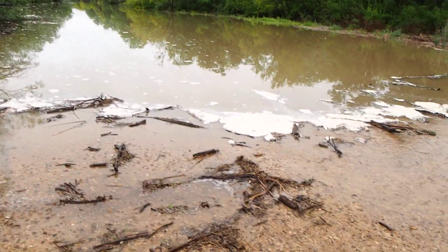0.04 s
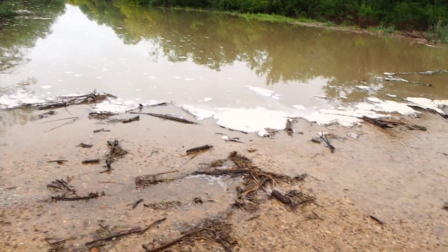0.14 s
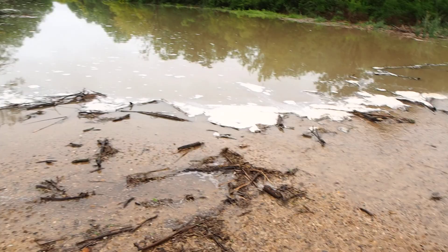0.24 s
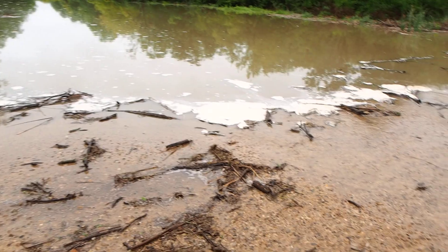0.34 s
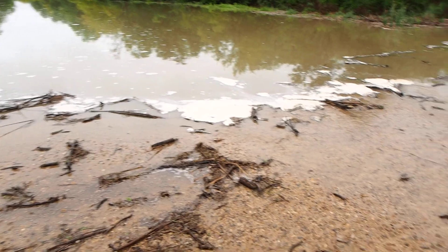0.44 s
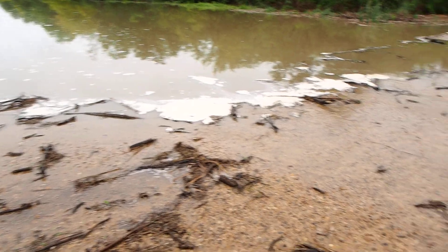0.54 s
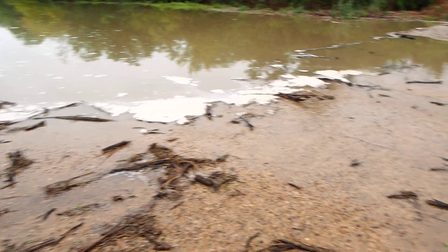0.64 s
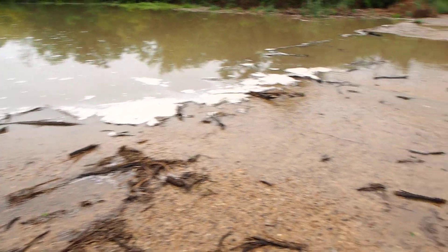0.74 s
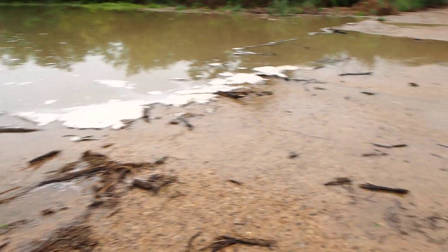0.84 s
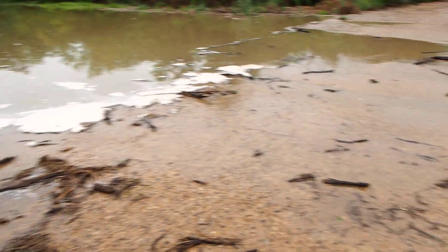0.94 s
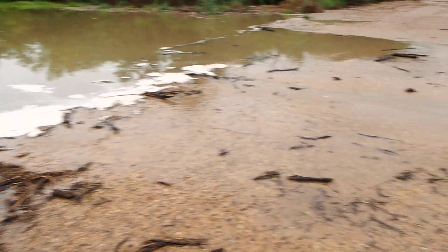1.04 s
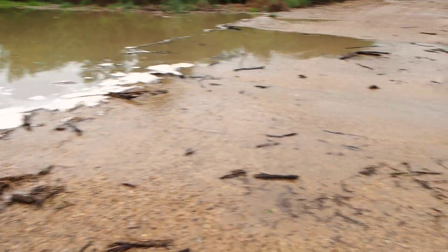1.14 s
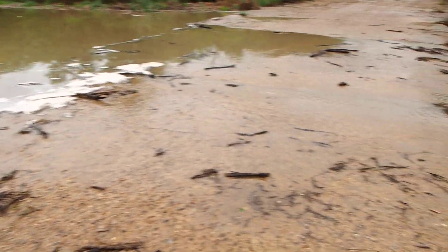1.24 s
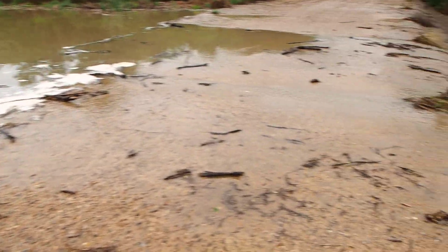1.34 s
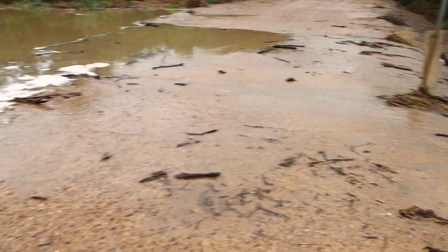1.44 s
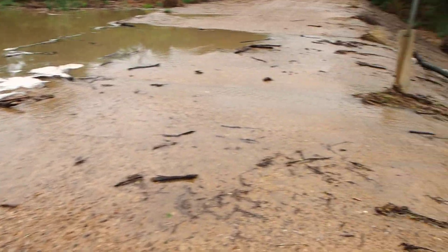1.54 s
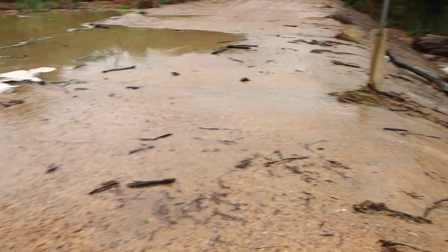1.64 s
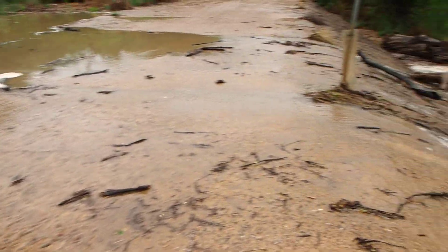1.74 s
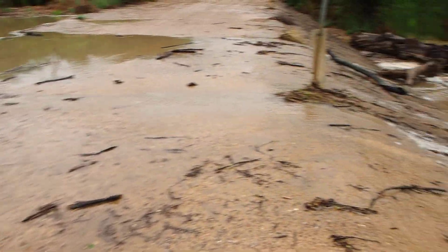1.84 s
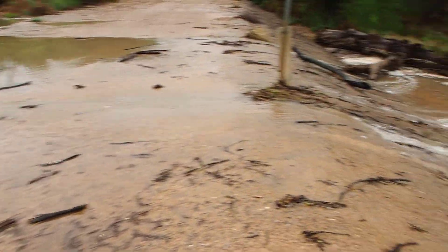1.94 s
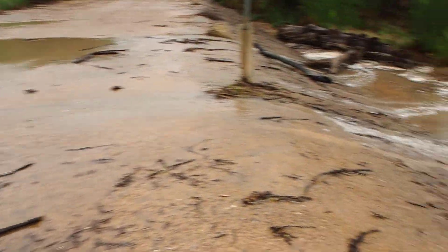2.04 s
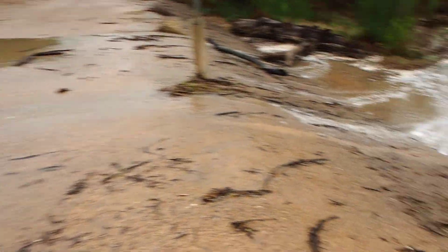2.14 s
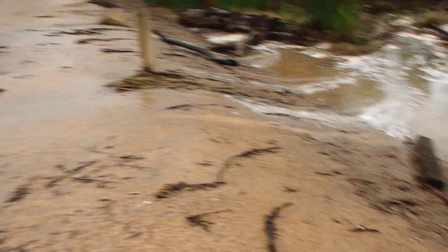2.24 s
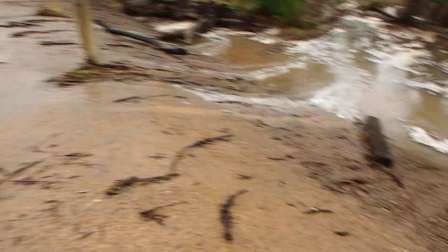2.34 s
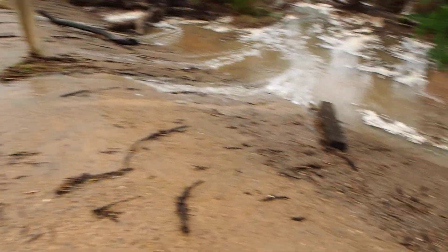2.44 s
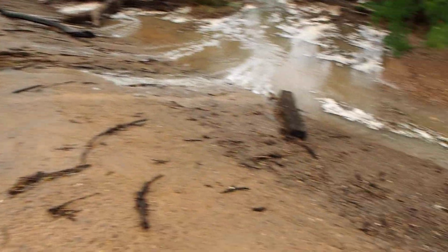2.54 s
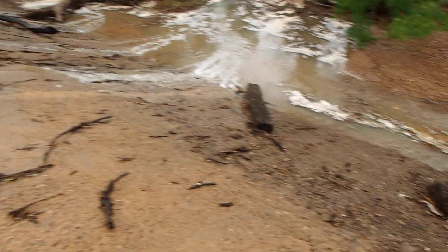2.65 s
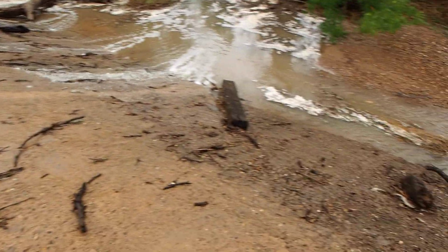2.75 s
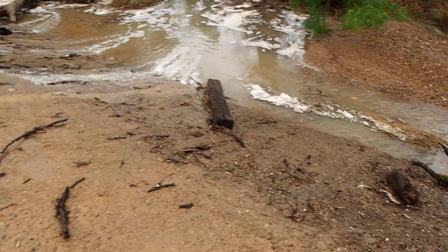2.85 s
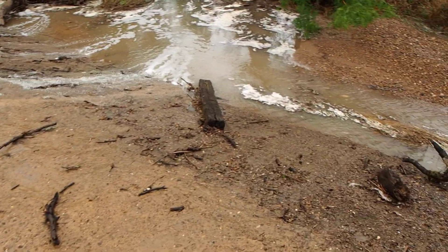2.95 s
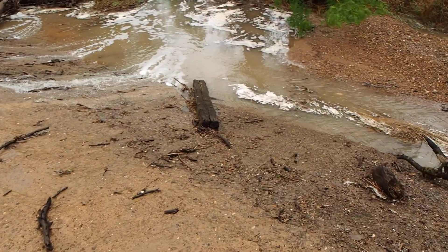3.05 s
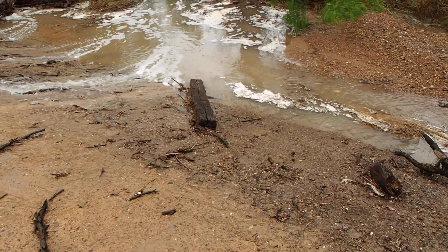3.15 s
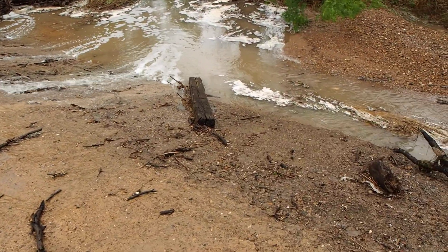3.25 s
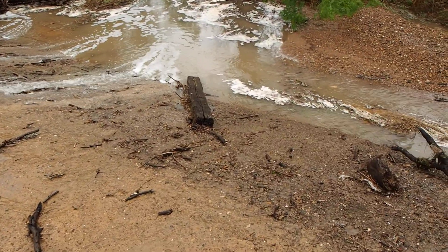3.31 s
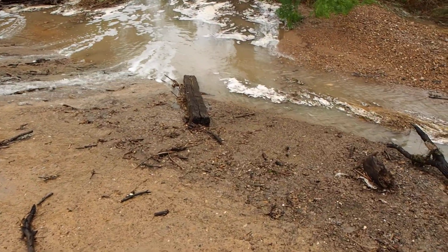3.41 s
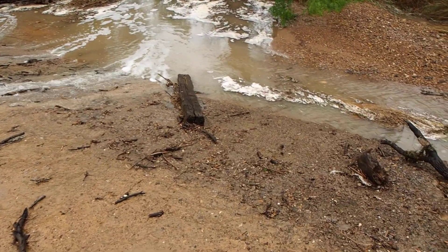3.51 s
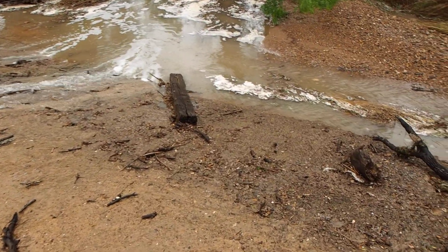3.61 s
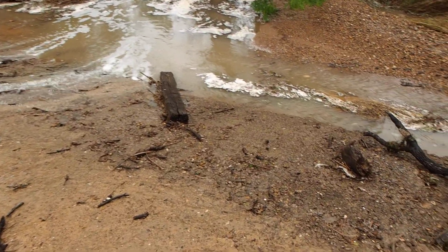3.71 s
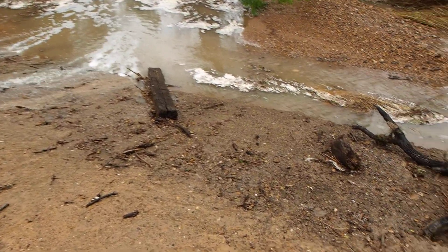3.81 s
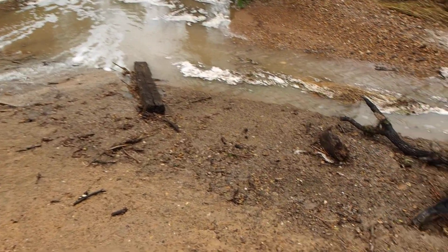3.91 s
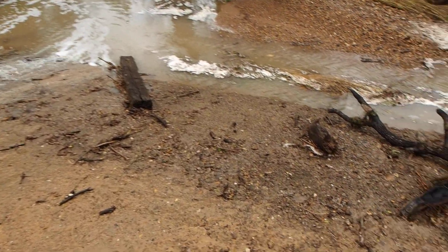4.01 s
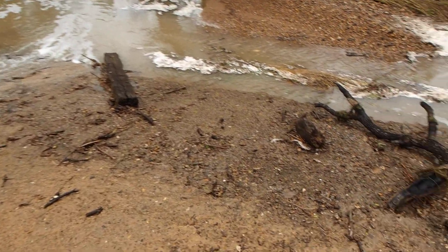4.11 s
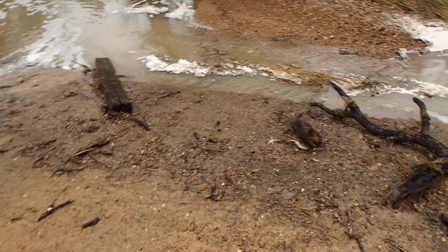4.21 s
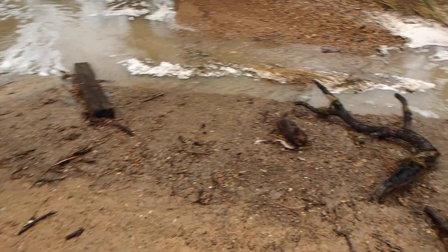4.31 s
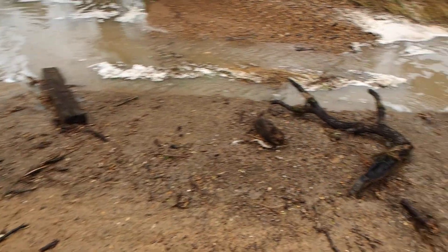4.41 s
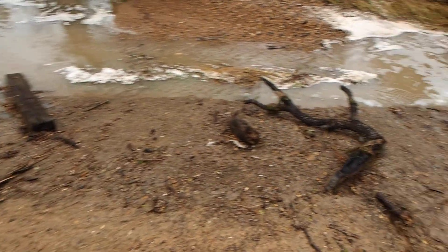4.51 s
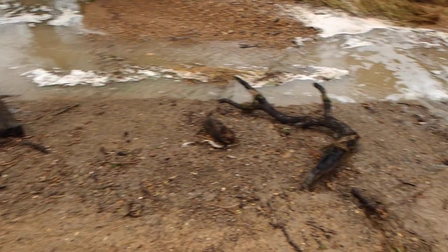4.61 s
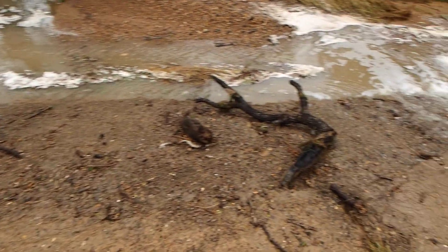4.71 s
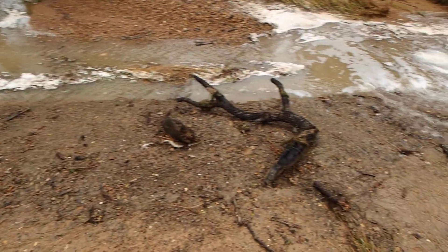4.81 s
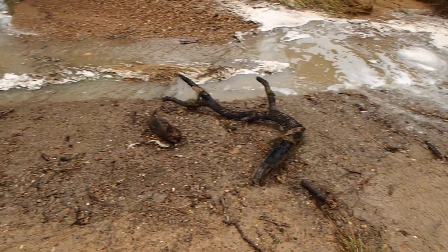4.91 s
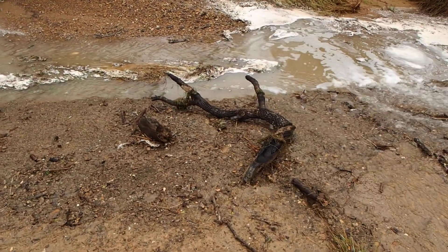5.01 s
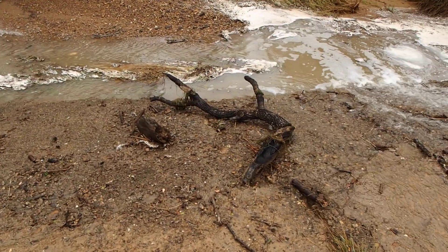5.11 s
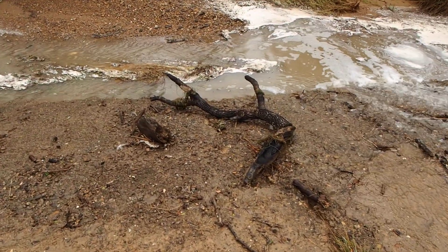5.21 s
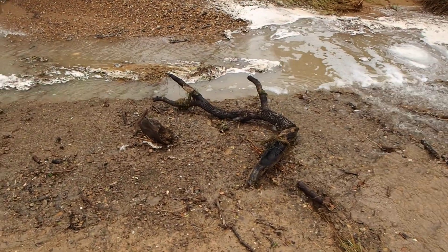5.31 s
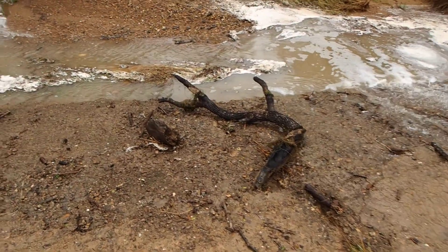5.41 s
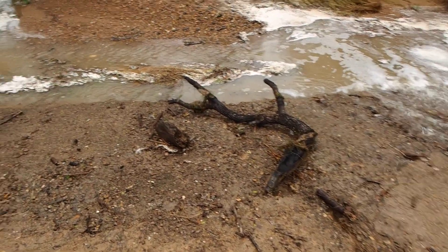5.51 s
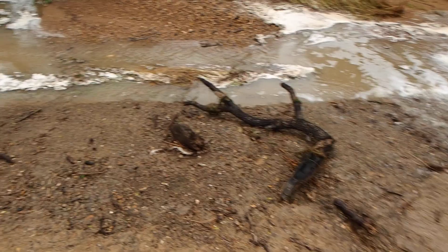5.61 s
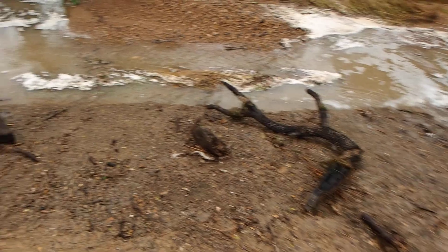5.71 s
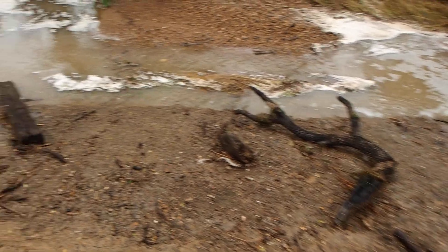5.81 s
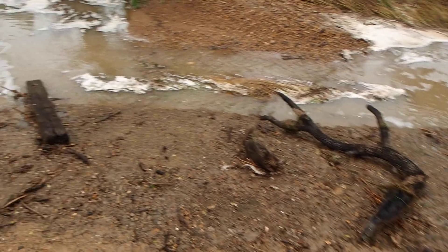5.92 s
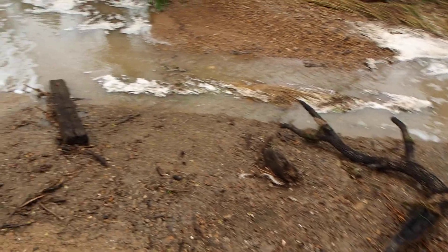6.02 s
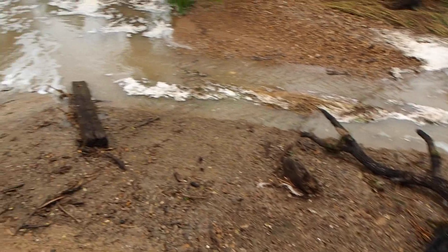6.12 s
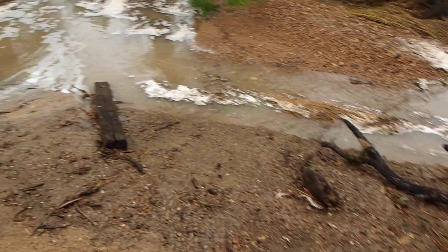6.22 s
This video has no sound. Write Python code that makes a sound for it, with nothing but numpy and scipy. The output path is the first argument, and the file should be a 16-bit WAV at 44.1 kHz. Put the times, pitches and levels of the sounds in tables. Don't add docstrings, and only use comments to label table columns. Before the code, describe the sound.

Broad turbulent creek rush with bubbling and fine spray ticks, starting duller, then growing fuller and hissier; low wind buffets come and go.

```python
import sys
import numpy as np
from scipy import signal
from scipy.fft import rfft, irfft, next_fast_len
from scipy.io import wavfile
from scipy.ndimage import map_coordinates

SR = 44100
rng = np.random.default_rng(int(sys.argv[2]) if len(sys.argv) > 2 else 0)


def elevation(decibels):
    levels = np.asarray(decibels, float)
    return 10 ** (levels / 20)


def to_wav(sig):
    pcm = np.clip(np.atleast_2d(sig), -1, 1) * 32767
    pcm = np.round(pcm).astype(np.int16)
    wavfile.write(sys.argv[1], SR, pcm.T)


N = 276066
CONTROL = 32

# f/Hz, level/dB [per Hz], left-right likeness [0-1], left minus right/dB
SIDE_SPECTRUM = [(35, -9, .5, 4), (86, -1.5, 0.66, -1), (244, -17, 0.9, 1.5), (447, -8.5, 0.9, 2.5),
                 (545, -11, 0.83, 4.5), (970, 1.5, 0.86, -1), (1250, -2.5, 0.42, 0), (2020, 1, 0.74, -6),
                 (3670, -9, 1, -6.5), (4850, -13, 0.94, -3.5), (6650, -20, 0.98, -8), (8600, -18.5, 0.4, 1),
                 (10800, -24, 0.9, -8), (15500, -40.5, .12, 0)]
FRONT_SPECTRUM = [(35, -11, 1, 0), (85, -1, 0.97, 0.5), (246, -18, 0.84, 1), (452, -9.5, 0.95, 1.1),
                  (497, -12.5, 1, 1.5), (929, 3.5, 0.91, 0.5), (1310, -1, 0.33, -1), (1940, 2.5, 0.12, -4),
                  (3760, -2.5, 0.27, 0), (5080, -9, 0.86, -0.5), (6980, -15, 0.16, -2),
                  (8600, -11, 0.3, 2.3), (10980, -19, 0.7, -4), (15500, -30.5, 0.12, 8.5)]
# t/s, lag of the left port for the crossing/samples
TURN_LAG = [(0, 5.6), (.4, 5.5), (.65, 4.7), (.9, 4.4), (1.5, 4.2), (1.8, 3.4), (2.05, 2.2), (2.7, -2.6),
            (3.3, -3.2), (4.1, -4.0), (5.1, -5.4), (6.26, -4.0)]
# t/s, rush level/dB, churn of white water level/dB
FLOW_LEVELS = [(0, -28.5, -3.5), (.7, -28.5, -7.5), (1.05, -29, 0), (1.75, -27.5, 4), (2.1, -26, 4),
               (2.5, -26.5, 2.5), (3.45, -25.5, -5.5), (3.8, -27, 3.5), (4.2, -26.5, 3), (4.85, -25, -1.4),
               (5.55, -25.5, -.5), (5.9, -27, 5), (6.26, -26.5, 2)]
# lag/samples, extra brightness/(dB per octave), extra left minus right/dB,
# extra deep roar level/dB
HOUSING_SHADE = [(0.5, 0.56, -0.26, 1), (-4, .8, -.2, .6), (-9, .5, 8, -3), (3, 0.1, -0.9, 0.5),
                 (4, .8, -1.4, 1.1), (4.5, 0.3, -2.5, 0), (5.5, -1.15, 0.1, 1.5)]
# t/s, half length/s, level/dB
BACKWATER_GURGLES = [
    (2.35, .2, 3.5),
    (4.0, 0.24, 3.5),
    (5.95, .3, 5.5),
]
# f/Hz, width/Hz, level/dB
PORT_RESONANCES = [
    [(1060, 52, 2.5), (9500, 900, 0.5), (12800, 1700, -2.5), (15600, 1300, -2)],
    [(1012, 46, 1.5), (9600, 1070, 2.5), (11500, 930, -0.9), (15600, 1300, 4)],
]
# t/s, peak level/dB [nearer port], f/Hz, left minus right/dB
NEAR_DROPS = [(1.231, -20, 10200, -31), (1.4691, -27, 8400, -10), (2.0396, -26, 11200, -14),
              (2.3054, -26, 9600, -9), (2.615, -22, 9500, -18), (2.6958, -21, 8750, 10),
              (3.5078, -18.5, 9500, -12), (3.686, -28, 8800, -12), (3.7087, -12.5, 8100, -8),
              (4.2433, -19, 8600, -6), (4.3598, -23, 11800, -12), (4.8161, -33, 6200, -19),
              (5.0387, -20, 11800, -12), (5.389, -17, 9000, 7), (5.4698, -24, 8600, -10),
              (5.5652, -18, 5800, -9), (5.6394, -18, 8000, -12), (5.6637, -19, 10200, -12),
              (5.6988, -22, 11100, -12), (5.7571, -21, 8500, 12), (6.0769, -21, 4500, -1),
              (6.174, -21, 9600, -5)]
# t/s, half length/s, level/dB
PORT_GUSTS = [
    [(2.15, 0.22, -46), (3.9, 0.16, -48), (4.45, .1, -48.5)],
    [(.24, 0.15, -37), (.85, 0.2, -46), (1.25, 0.11, -44), (1.62, 0.082, -51)],
]
# t/s, peak level/dB, f/Hz
HARD_EDDIES = [
    [(.068, -46, 84.3), (2.012, -53, 90), (2.041, -45, 86), (2.192, -43, 94), (3.922, -44, 85),
     (4.374, -34, 76), (4.445, -41, 92), (4.505, -42, 86)],
    [(.006, -38, 86), (.274, -40, 108), (.416, -34, 93.5), (.463, -27, 85.4), (.501, -30, 91.5),
     (.532, -23.5, 115), (.585, -28, 152), (.62, -36, 79.5), (.663, -33, 110), (.805, -41, 108),
     (1.051, -40, 96), (1.251, -35.5, 77), (1.366, -33, 89.5), (1.401, -34, 72), (1.428, -30, 126),
     (1.494, -29.5, 116), (1.534, -35, 77), (1.623, -42, 80)],
]

SIDE_ON_LAG, HEAD_ON_LAG = 5, -4.5
CREEK_LAG, CREEK_FOLLOWS, CREEK_MOST = 7.64, 0.85, 7.1
CHURN_BRIGHTENS = 0.1
RIPPLE_DB, LIKENESS_LOST = 2.2, 0.32
TOP_SHADE_DB = 1.5
FAINT_DROPS, FAINT_DB, FAINT_SCATTER_DB, FAINT_HZ, FAINT_PAN_DB = 16, -34, 8, 9500, -11
EDDIES_PER_S, EDDY_HZ, EDDY_SPREAD_OCT, EDDY_SCATTER_DB = 27, 92, 0.26, 4


def rush():
    turn, = in_time(TURN_LAG, step=CONTROL)
    rush_db, churn_db = in_time(FLOW_LEVELS, step=CONTROL)
    facing = np.clip((SIDE_ON_LAG - turn) / (SIDE_ON_LAG - HEAD_ON_LAG), 0, 1)
    creek_lag = np.minimum(CREEK_LAG + CREEK_FOLLOWS * turn, CREEK_MOST)
    lag, *shading = np.transpose(HOUSING_SHADE)
    bright_db, lean_db, roar_db = (np.interp(turn, lag, column) for column in shading)
    bright_db = bright_db + CHURN_BRIGHTENS * churn_db
    gurgle_db = gurgling(np.arange(len(facing)) * CONTROL / SR)
    hiss = rng.standard_normal((2, 4, N))
    grains = splashes(per_s=2400, spread_db=5.0, count=4)
    surge = 0.4 * drift(6.0) + 2.5 * drift(28.0)
    edges = 25 * 2 ** (np.arange(29) / 3)
    aimed = np.zeros((2, 2, 2, N))
    diffuse = np.zeros((2, N))
    for k, (low, high) in enumerate(zip(edges, edges[1:])):
        hz = np.sqrt(low * high)
        grainy = np.clip(0.2 * np.log2(hz / 1500), 0, 0.6)
        shifted = np.roll(grains, 9001 * (k // 2), axis=1)
        source = np.sqrt(1 - grainy ** 2) * hiss[k % 2] + (-1) ** k * grainy * shifted
        third_octave = signal.butter(2, [low, high], "band", fs=SR, output="sos")
        bands = signal.sosfilt(third_octave, source)

        side, front = at_hz(SIDE_SPECTRUM, hz), at_hz(FRONT_SPECTRUM, hz)
        db, alike, pan_db = ((1 - facing) * a + facing * b for a, b in zip(side, front))
        db = db - front[0] - 25.0
        surge_share = 0.1 if 900 < hz < 3500 else 0.3
        db = db + (surge_share * surge + 0.72 * drift(28.0)) * (1.4 if hz < 350 else 0.9)
        if hz > 200:
            if hz < 1300:
                tilt_db = roar_db * (1.3 if hz < 850 else 0.9)
            else:
                tilt_db = bright_db * np.log2(hz / 2000)
            churn = churn_db * np.exp(-(np.log2(hz / (1750 + 750 * facing ** 2)) / 0.26) ** 2)
            db = db + rush_db + 29.5 + tilt_db + 0.91 * churn
            pan_db = pan_db + lean_db + 0.81 * churn
        if hz > 11000:
            db = db - TOP_SHADE_DB * facing * np.maximum(creek_lag - 4.2, 0)
        if 140 < hz < 480:
            db = db + gurgle_db
        if hz > 1500:
            half_waves = 2 * hz * turn / SR
            ripple_db = -RIPPLE_DB * np.cos(np.pi * half_waves) * (1 - facing)
            db, pan_db = db + ripple_db / 2, pan_db + ripple_db
            alike = alike - LIKENESS_LOST * np.clip((half_waves - 1) / 0.12, 0, 1)
        alike = np.clip(alike, 0, 1)

        spill = 0.64 * np.exp(-(np.log2(hz / 5300) / 0.74) ** 2) + 0.32 * (hz < 1600)
        creek = np.clip(facing * (0.82 - spill), 0, 1)
        waves = aimed[int(hz < 1300)]
        for port, sign in enumerate((0.5, -0.5)):
            gain = elevation(db + sign * pan_db)
            waves[0, port] += full(gain * np.sqrt(alike * (1 - creek))) * bands[2]
            waves[1, port] += full(gain * np.sqrt(alike * creek)) * bands[3]
            diffuse[port] += full(gain * np.sqrt(1 - alike)) * bands[port]
    return colour(diffuse + arrive(aimed, (turn, creek_lag)), FRONT_SPECTRUM)


def gurgling(t):
    return sum(db * np.exp(-((t - mid) / half) ** 2) for mid, half, db in BACKWATER_GURGLES)


def arrive(aimed, lags):
    out = np.zeros((2, N))
    for waves, bend in zip(aimed, (0, 1.8)):
        for (left, right), lag in zip(waves, lags):
            when = np.arange(N) - full(lag + bend)
            out[0] += map_coordinates(left, [when], order=3, mode="nearest")
            out[1] += right
    return out


def colour(x, spectrum):
    size = next_fast_len(N)
    hz = np.maximum(np.arange(size // 2 + 1) * SR / size, 1)
    db = at_hz(spectrum, hz)[0] - 18.0 * np.maximum(np.log2(spectrum[0][0] / hz), 0)
    humps = [sum(level * np.exp(-((hz - mid) / width) ** 2) for mid, width, level in port)
             for port in PORT_RESONANCES]
    return irfft(rfft(x, size) * elevation(db + np.array(humps)), size)[:, :N]


def splashes(per_s, spread_db, count):
    sizes = elevation(spread_db * np.minimum(rng.exponential(1, (count, N)), 5.5))
    signs = rng.choice([-1, 1], (count, N))
    return unit(sizes * signs * (rng.random((count, N)) < per_s / SR))


def bubbles(late):
    rush_db = in_time(FLOW_LEVELS)[0]
    pops = splashes(per_s=500, spread_db=3.0, count=1)[0]
    pitches = np.geomspace(600, 2400, num=16)
    dealt = rng.integers(0, 16, N)
    rings = sum(np.sqrt(hz) * ring(pops * (dealt == k), hz, 19.0 / hz) for k, hz in enumerate(pitches))
    rings = elevation(rush_db - 17.5) * unit(rings)
    left = elevation(-4.5) * np.interp(np.arange(N) - late, np.arange(N), rings)
    return np.array([left, rings])


def ring(clicks, hz, t60):
    r, w = elevation(-60 / (t60 * SR)), 2 * np.pi * hz / SR
    return signal.lfilter([0, np.sin(w)], [1, -2 * r * np.cos(w), r * r], clicks + 1e-18)


def drops():
    out, t = np.zeros((2, N)), np.arange(-128, 128) / SR
    for s, db, hz, pan_db in list(NEAR_DROPS) + faint_drops():
        tick = 0.68 * np.sin(2 * np.pi * hz * t) * np.exp(-(t * hz / 2.5) ** 2)
        i = round(s * SR) - 128
        out[:, i:i + len(t)] += elevation([[db + min(pan_db, 0)], [db - max(pan_db, 0)]]) * tick
    return out


def faint_drops():
    when, side = rng.random((FAINT_DROPS, 2)).T
    size, pitch = rng.standard_normal((FAINT_DROPS, 2)).T
    pan_db = np.where(side < 0.8, FAINT_PAN_DB, -FAINT_PAN_DB)
    return list(zip(0.8 + 5.4 * when, FAINT_DB + FAINT_SCATTER_DB * size, FAINT_HZ * 2 ** (0.25 * pitch), pan_db))


def wind():
    out, t = np.zeros((2, N + 6000)), np.arange(-3000, 3000) / SR
    for port, (hard, gusts) in enumerate(zip(HARD_EDDIES, PORT_GUSTS)):
        rows = list(hard) + eddies(gusts)
        for (s, db, hz), (start, slide) in zip(rows, rng.random((len(rows), 2))):
            turns = hz * t * (1 + 53.0 * (slide - 0.5) * t) + start
            push = np.sin(2 * np.pi * turns)
            push += 0.24 * np.sin(4 * np.pi * turns) + 0.34 * np.sin(np.pi * turns)
            i = round(s * SR)
            out[port, i:i + len(t)] += elevation(db - 0.5) * push * np.exp(-(t * hz / 2.14) ** 2)
    return out[:, 3000:N + 3000]


def eddies(gusts):
    count = int(EDDIES_PER_S * (N / SR))
    slip, size, pitch = rng.standard_normal((count, 3)).T
    s = np.clip((np.arange(count) + 0.5 + 0.214 * slip) / EDDIES_PER_S, 0, N / SR)
    gust_db = np.max([top_db - 12.0 * ((s - mid) / half) ** 2 for mid, half, top_db in gusts], axis=0)
    return list(zip(s, gust_db + EDDY_SCATTER_DB * size, EDDY_HZ * 2 ** (EDDY_SPREAD_OCT * pitch)))


def unit(x):
    return x / np.sqrt(np.mean(x ** 2) + 1e-20)


def in_time(rows, step=1):
    s, *columns = np.transpose(rows)
    t = np.arange(N // step + (step > 1)) * step / SR
    return [np.interp(t, s, column) for column in columns]


def at_hz(rows, hz):
    f, *columns = np.transpose(rows)
    return [np.interp(np.log(hz), np.log(f), column) for column in columns]


def full(slow):
    return np.interp(np.arange(N) / CONTROL, np.arange(len(slow)), slow)


def drift(rate):
    r = np.exp(-2 * np.pi * CONTROL * rate / SR)
    noise = rng.standard_normal(N // CONTROL + 3002)
    return unit(signal.lfilter([1], [1, -2 * r, r * r], noise)[3001:])


def scene():
    return rush() + bubbles(in_time(TURN_LAG)[0]) + drops() + wind()


def roll_off(x):
    return signal.sosfilt(signal.butter(12, 15740, fs=SR, output="sos"), x)


def record(dry):
    mix = dry - 0.0024
    return roll_off(mix)


dry = scene()
out = record(dry)
to_wav(out)
```